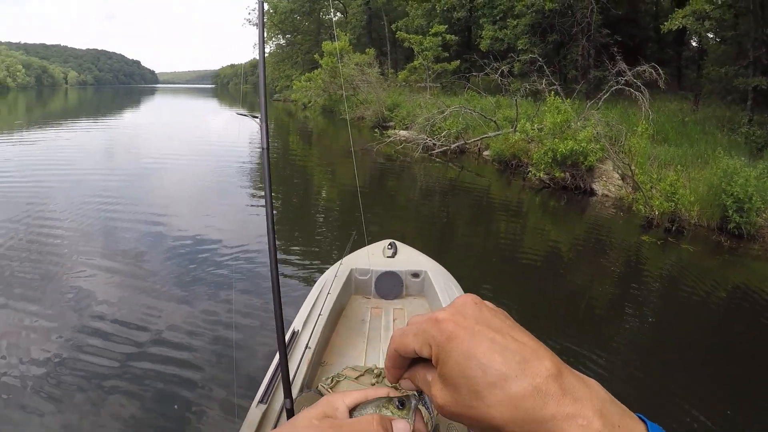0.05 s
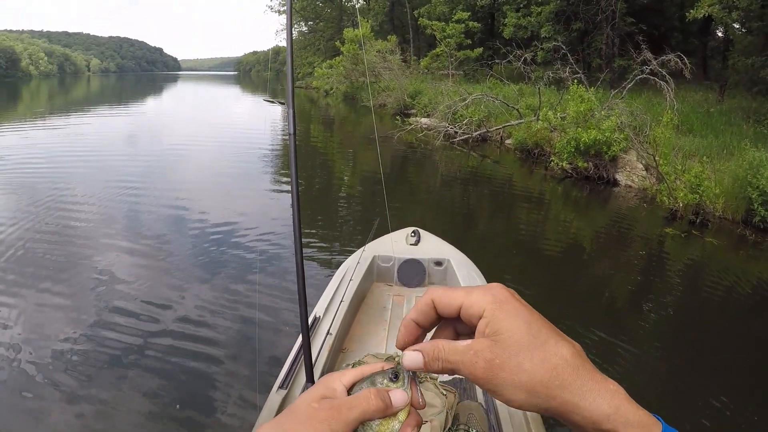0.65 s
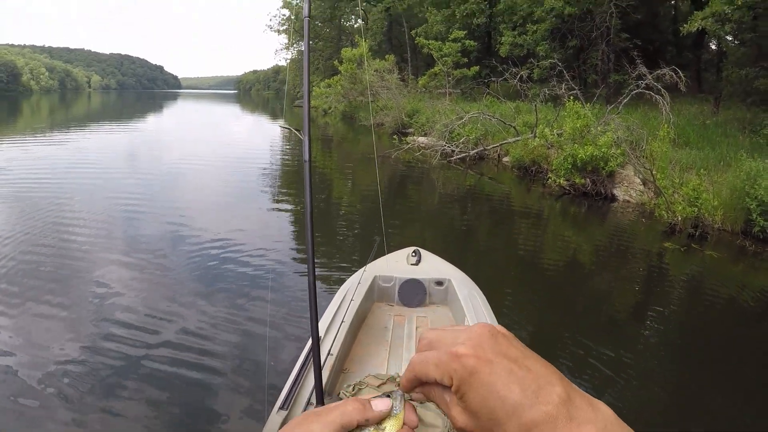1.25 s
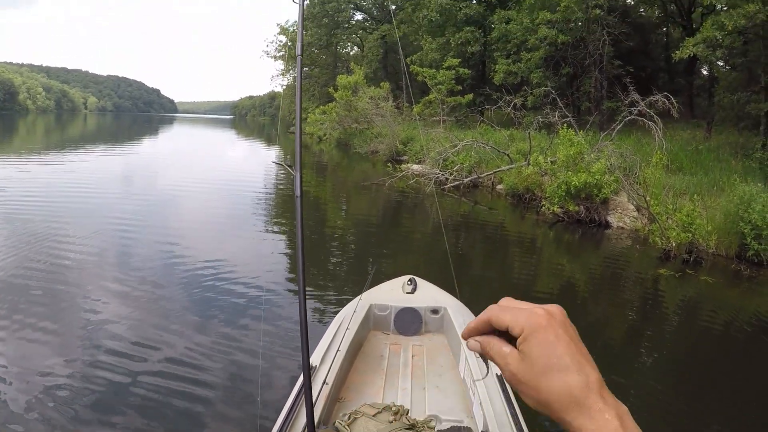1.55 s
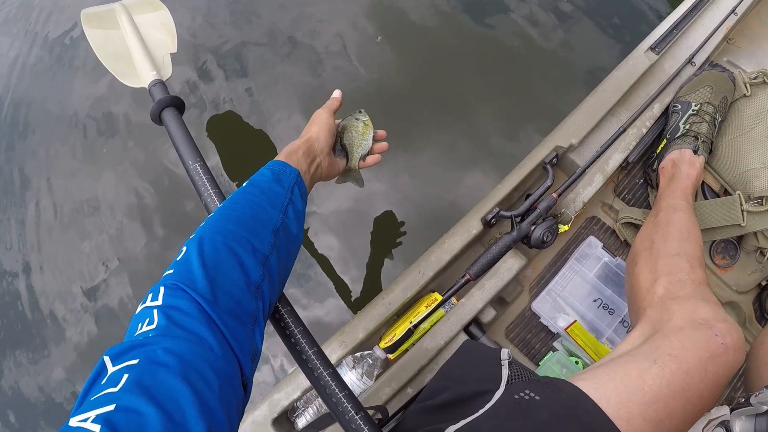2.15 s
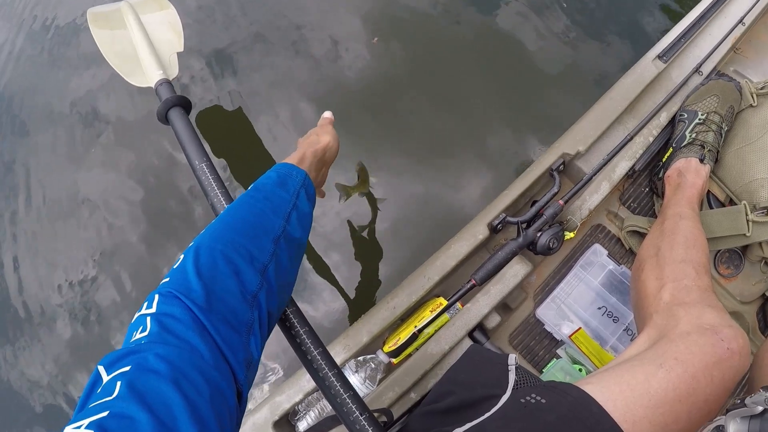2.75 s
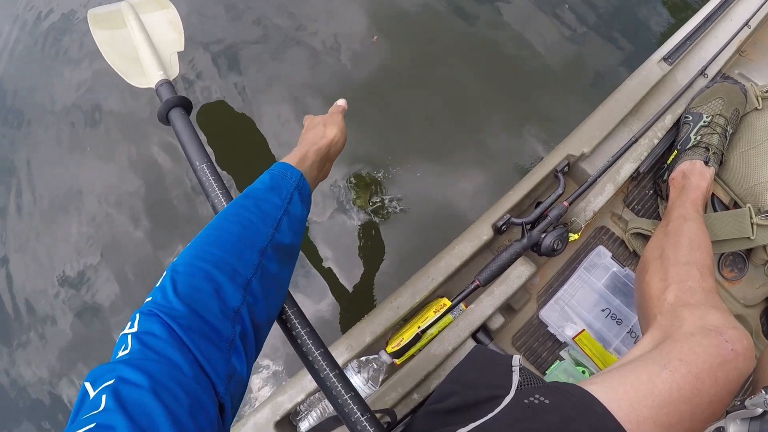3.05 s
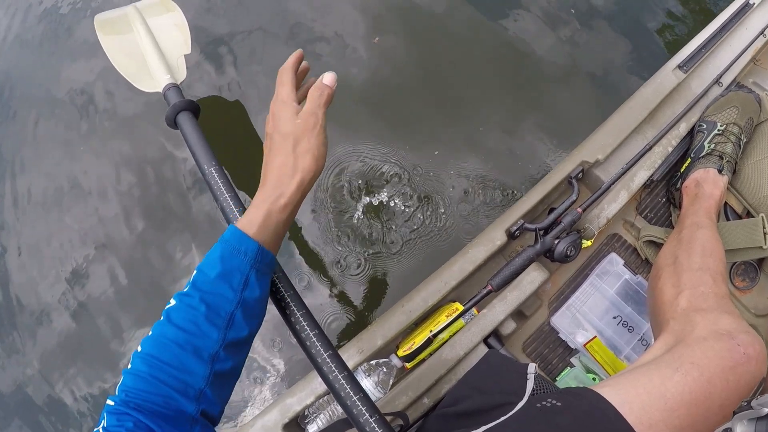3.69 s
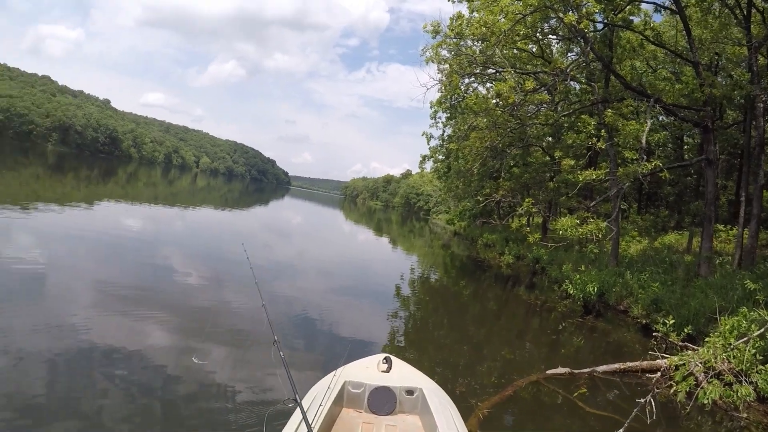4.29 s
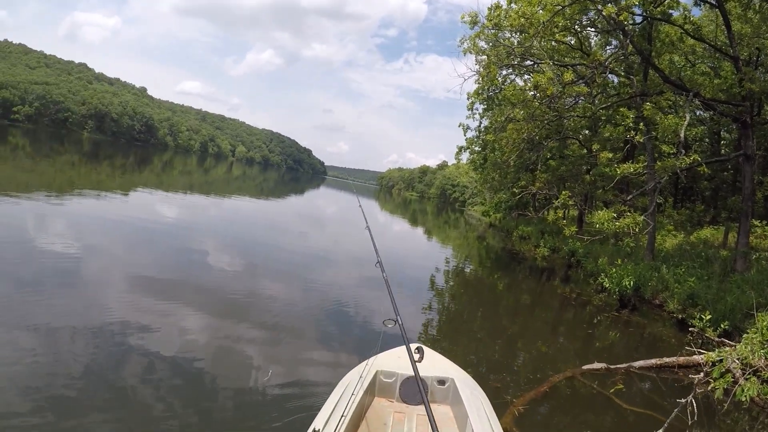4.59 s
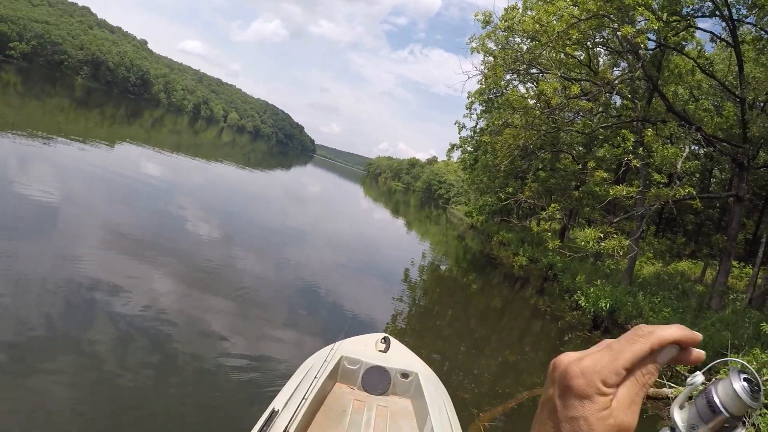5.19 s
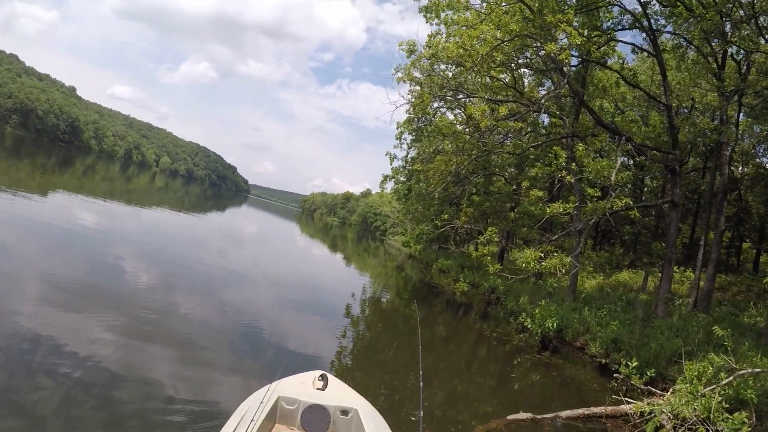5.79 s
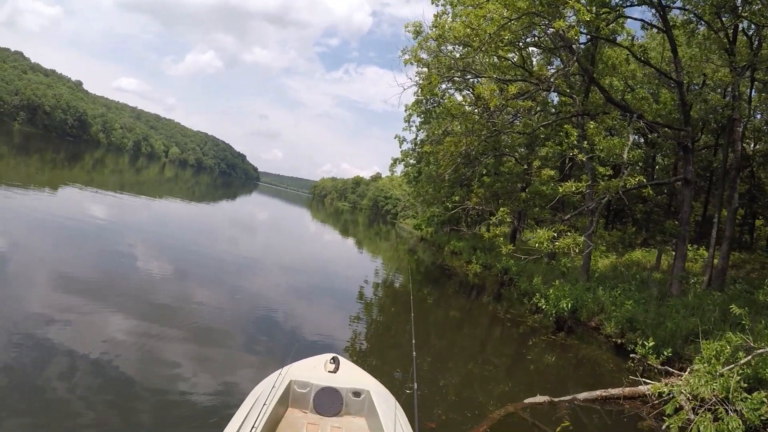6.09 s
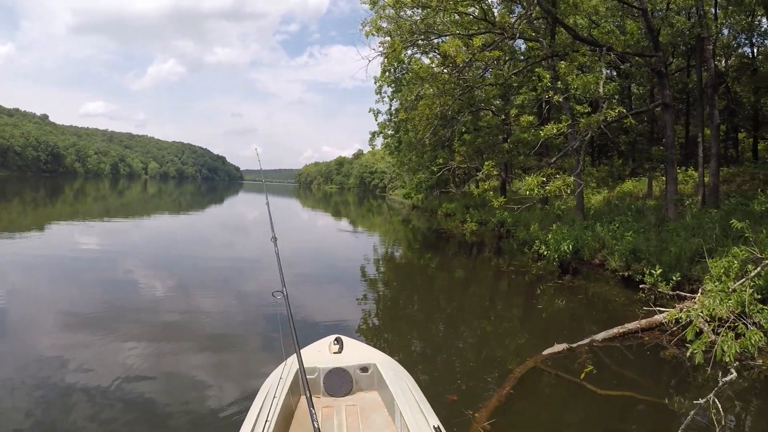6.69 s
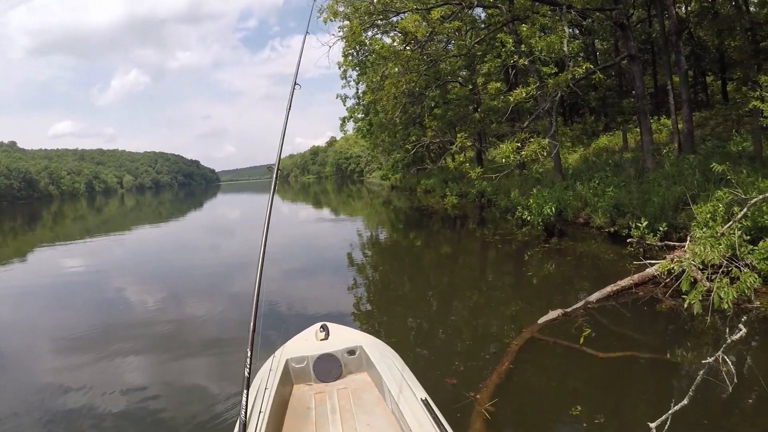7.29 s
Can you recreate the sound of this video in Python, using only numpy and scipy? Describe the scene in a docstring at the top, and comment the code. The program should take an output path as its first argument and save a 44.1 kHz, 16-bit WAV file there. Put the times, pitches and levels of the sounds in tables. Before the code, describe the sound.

A quiet, wide hush lies over a lake. For the first 1.5 seconds a breeze buffets the microphone and cloth rubs on it with a low rumble, while songbirds chirp and whistle from the right, echoing in trees. From about 2 to 3.8 seconds the sound is slowed and muffled: dull drips and ringing bubbles build to one loud plop of a small fish at 3 seconds. A sharp, close tackle click at 3.9 seconds brings back normal sound, with more chirps and faint far insects. Around 5.2 seconds a rod swishes, line zips briefly over its guides, a sleeve rustles and the hollow kayak hull bumps. Birds keep calling. More sharp clicks come at about 6.6 seconds, then a soft bump, and from 7 seconds the reel knocks faintly and faster as it is wound.

```python
"""A breeze buffets the microphone and cloth rubs its mount, in a kayak lying still by a wooded lake shore.
Songbirds whistle from the right bank and the trees echo them, over far insects and a wide hush.
From about 2 to 3.8 s a small fish is let go in slow motion: dull drips, ringing bubbles and one plop.
Back at normal speed, tackle clicks close by, the hollow hull bumps, the rod casts with a zip of line
over its guides, and the reel knocks softly as it is wound."""
import sys
import numpy as np
from scipy import signal
from scipy.fft import rfft, irfft, next_fast_len
from scipy.io import wavfile

SR = 44100
rng = np.random.default_rng(int(sys.argv[2]) if len(sys.argv) > 2 else 0)


def store_pcm(level_fs):
    """Save levels as 16-bit WAV."""
    pcm = np.round(np.clip(level_fs, -1, 1) * 32767).astype(np.int16)
    wavfile.write(sys.argv[1], SR, np.atleast_2d(pcm).T)


N = 328104
PADDED = next_fast_len(N, real=True)
TIME, FREQS = np.arange(N) / SR, np.fft.rfftfreq(PADDED, 1 / SR)


# the fish slaps the surface beside the kayak: (time [s], peak [dB], pitch [Hz])
FISH_SLAPS = [(3.005, -16.5, 1820), (3.019, -14, 830), (3.0277, -14.5, 1120)]
# larger bubbles: (time [s], peak [dB], pitch [Hz], ring [cycles], pan [dB]); pan is left minus right
TRAPPED_BUBBLES = [(2.067, -40, 1330, 12, 0), (2.498, -42.5, 1420, 13, -1.5), (2.701, -39.5, 680, 14, 2),
                   (2.795, -32.5, 121, 9.3, -6.5), (2.821, -39, 940, 14, -2), (2.8415, -33, 1484, 75, 0),
                   (2.86, -37, 1650, 33, 4), (2.927, -40, 1910, 44, 4), (2.941, -32.5, 319, 42, 5.5),
                   (2.963, -28, 338.3, 37, 9), (3.003, -19, 489, 14.4, 8), (3.0235, -23.5, 614, 31, 0),
                   (3.029, -16.5, 1100, 33, -1), (3.079, -41, 215, 34, 0.5), (3.0885, -34, 1420, 50, -1),
                   (3.142, -38.5, 698, 89, -3.5), (3.231, -35.5, 416, 24, 7)]
# water stirred up and falling back: (time [s], length [s], level [dB], pan [dB])
SPLASHES = [(2.055, .015, -59, 0), (2.695, 0.044, -49.5, -0.5), (2.75, .06, -50.5, 0),
            (2.818, 0.045, -45.5, 2), (2.87, 0.15, -55, -2), (2.998, 0.011, -30.5, -4.5),
            (3.017, 0.014, -31.5, 3), (3.06, .065, -46.5, 1), (3.13, 0.035, -52, -2), (3.2, 0.61, -65, 2.5)]
# tone of the falling drops: (frequency [Hz], gain [dB])
DROP_COLOUR = [(100, 1.5), (300, -2), (700, -4), (1400, 1.5), (2200, -4), (3200, -14), (4000, -19)]

def fish_release(drops_per_s=1800, drop_pitches=30, drop_cycles=9, bubble_rise_per_s=8.5):
    """A fish slaps the water; trapped bubbles ring, rising in pitch as they surface, amid tiny drops."""
    out, patter = np.zeros((2, 2, N))
    slaps = [(s, db, hz, 0.0068, 0.12, 0.23, 1) for s, db, hz in FISH_SLAPS]
    bubbles = [(s, db, hz, cycles / hz, bubble_rise_per_s * cycles / hz, 0.51, pan_db)
               for s, db, hz, cycles, pan_db in TRAPPED_BUBBLES]
    for s, db, hz, t60, rise, swell_cycles, pan_db in slaps + bubbles:
        lead_rad = 0.7 + 0.11 * pan_db  # water farther left reaches the left port earlier
        add(out, s, amp(db) * ping(hz, t60, rise, lead_rad, swell_cycles) * pan(pan_db))
    for hz in np.geomspace(280, 3700, drop_pitches):
        lands = rng.random(N) < drops_per_s / drop_pitches / SR
        sizes = amp(0.5 * np.minimum(rng.exponential(1, N), 3))
        drop = ping(hz, drop_cycles / hz, rise=0.2, lead_rad=rng.normal(0.36, 1.0), swell_cycles=0.2)
        patter += signal.oaconvolve((lands * sizes)[None], drop[:, :SR // 20] * hz, axes=1)[:, :N]
    out += unit(colour(patter, DROP_COLOUR)) * swells(SPLASHES, attack_s=0.0035, release_s=0.011)
    return out + amp(-18) * echoes(out, t60=0.17, gap_s=0.0052, build_s=0.0041)


def slow_motion_tone(x, edge_hz=3900, rate_hz=12000):
    """Sparse samples joined by straight lines: a dull sound under a faint, glassy mirror image."""
    mirrored = low_pass(x, edge_hz) * (1 + 2 * amp(1.5) * np.cos(2 * np.pi * rate_hz * TIME))
    return irfft(rfft(mirrored, PADDED) * np.sinc(FREQS / rate_hz) ** 2, PADDED)[:, :N]


# hard tackle clicking close by: (time [s], level [dB], pitch [Hz], mode spread [octaves], pan [dB])
TACKLE_CLICKS = [(.0812, -40, 6900, 0.28, -9), (0.148, -28, 3750, 0.44, -3),
                 (3.9309, -15, 6330, .14, -10.5), (3.932, -39, 11500, .24, 2), (3.934, -23, 6300, 0.29, -7),
                 (3.9428, -25, 1750, 0.26, -4), (3.9422, -27.5, 5250, .55, 6), (4.808, -39, 3300, .35, -10),
                 (4.991, -39, 6930, 0.18, -17), (5.3325, -38, 5030, 0.4, -4), (5.345, -31, 3320, 0.18, -1),
                 (6.631, -18, 4700, 0.37, -2), (6.6395, -32, 5000, 0.77, -2), (6.6525, -35, 6600, 0.33, 3),
                 (6.665, -30.5, 1800, 0.13, -2), (6.6662, -30.5, 5500, 0.54, -1),
                 (7.2995, -37.5, 1460, 0.072, -10), (7.354, -37, 9100, 0.65, -6)]
# dull knocks of rod and reel: (time [s], level [dB], pan [dB])
ROD_KNOCKS = [(3.944, -42, -4), (4.9905, -38.5, -5), (5.405, -42.5, 8), (6.7125, -41.5, -7),
              (6.775, -43, -3)]

def tackle(modes=24, knock_hz=819, reel_from_s=6.975):
    """Each contact rings a cluster of short plastic modes; the open hull throws a little back."""
    gaps_s = np.maximum(0.105 * 0.79 ** np.arange(8), 0.04)  # the reel handle gathers speed
    reel = [(reel_from_s + s, -46.5 - 3 * s, -11.5) for s in np.cumsum(gaps_s) - gaps_s]
    clicks = [(s, db, hz, 0.0082 * 5070 / hz, octaves, pan_db)  # higher clicks die sooner
              for s, db, hz, octaves, pan_db in TACKLE_CLICKS]
    knocks = [(s, db, knock_hz, 0.12, 0.224, pan_db) for s, db, pan_db in ROD_KNOCKS + reel]
    out, t = np.zeros((2, N)), np.arange(SR // 8) / SR
    for s, db, hz, t60, octaves, pan_db in clicks + knocks:
        scatter, port_offset, start_phase = rng.standard_normal((3, modes, 1))
        spread = np.sqrt(3) * np.linspace(-1, 1, modes)[:, None] + 0.36 * scatter
        mode_hz = np.minimum(hz * 2 ** (octaves * spread), SR / 3)
        phase = 2 * np.pi * (mode_hz * t + start_phase)
        ring = np.array([np.sin(phase + 0.65 * port_offset).sum(0), np.sin(phase).sum(0)])
        ring *= amp(-60 * t / t60) * (1 - np.exp(-t / 0.0001))
        add(out, s, amp(db) * ring / (1.35 * np.sqrt(modes)) * pan(pan_db))
    return out + amp(-11) * echoes(out, t60=0.12, gap_s=0.0066, build_s=0.0011)


# line running over the guides: (time [s], buzz rate [Hz])
LINE_RATE = [(5.2, 927), (5.275, 1153), (5.335, 1270), (5.46, 1136)]
# spurts off the spool; the rod's back and forward swings: (time [s], length [s], level [dB], pan [dB])
LINE_SPURTS = [(5.225, 0.042, -47.5, 1), (5.258, 0.028, -42, -1), (5.316, 0.01, -45.5, -10)]
ROD_SWINGS = [(5.09, .14, -51, -2), (5.26, 0.16, -46, -3.5)]
# tone of line and rod: (frequency [Hz], gain [dB])
LINE_COLOUR = [(2500, -28), (3600, -1.5), (4600, -1), (6000, 1), (7400, 4.5), (9000, -8), (11500, -15),
               (14500, -16)]
ROD_COLOUR = [(150, -15), (330, 10), (480, 5), (700, -6.5), (1000, -2.5), (1400, -14), (2500, -12),
              (6000, -52)]

def cast(roughness=0.81, jitter=0.01234):
    """The rod sweeps the air near the microphone while the line zips out, buzzing over the guides."""
    turns = np.cumsum(curve(LINE_RATE) * (1 + jitter * drift(215))) / SR
    buzz = unit(sum(np.cos(2 * np.pi * k * turns + k * k) for k in range(3, 13)))
    line = unit(colour(buzz, LINE_COLOUR)) + roughness * noise(LINE_COLOUR)
    whoosh = noise(ROD_COLOUR) * swells(ROD_SWINGS, attack_s=0.014, release_s=0.018)
    return unit(line) * swells(LINE_SPURTS, attack_s=0.0072, release_s=0.009) + whoosh


# soft blows on the kayak: (time [s], peak [dB], pitch [Hz], t60 [s], pan [dB])
HULL_BUMPS = [(1.696, -32.5, 262, 0.058, 2), (3.941, -40, 410, 0.024, -4), (5.234, -33.5, 260, 0.027, -16),
              (5.283, -21, 219, 0.018, -14.5), (6.774, -31.5, 278, 0.027, -5)]

def hull():
    """The hollow hull answers a soft blow with a few low cycles."""
    out = np.zeros((2, N))
    for s, db, hz, t60, pan_db in HULL_BUMPS:
        add(out, s, amp(db) * ping(hz, t60, rise=0, lead_rad=2.5, swell_cycles=2.3) * pan(pan_db))
    return out


# arched syllables: (time [s], length [s], first [Hz], middle [Hz], last [Hz], source level [dB])
BANK_CHIRPS = [(0.108, 0.034, 3310, 3000, 2900, -62), (0.274, 0.024, 2400, 2360, 2270, -61),
               (0.504, 0.029, 6570, 6040, 4530, -49.5), (0.525, 0.031, 4330, 5050, 5800, -52),
               (.555, 0.049, 5650, 5780, 5700, -56), (0.707, 0.03, 2960, 3200, 3300, -56),
               (0.73, 0.056, 2776, 3567, 2640, -48), (0.775, 0.058, 2850, 2523, 2900, -50.5),
               (0.845, 0.036, 2680, 3410, 3900, -51), (1.002, 0.046, 2810, 3430, 4280, -58),
               (1.455, 0.052, 2427, 2620, 3100, -64), (1.528, 0.052, 3140, 2890, 2450, -63),
               (4.159, 0.035, 3470, 3700, 3050, -57), (4.184, 0.039, 2960, 3710, 4520, -50),
               (4.21, 0.079, 3405, 3350, 2570, -51.5), (4.288, .03, 2880, 3000, 2450, -57),
               (4.405, 0.054, 2570, 2840, 3200, -57), (4.453, 0.033, 3020, 3800, 3240, -47),
               (4.482, 0.019, 2850, 2625, 2510, -51), (4.506, 0.051, 2570, 3210, 3400, -52),
               (5.06, .05, 4700, 4500, 4400, -61), (5.158, 0.032, 3600, 3350, 3100, -56),
               (5.5, 0.021, 6200, 5900, 5670, -47.5), (5.531, 0.033, 4640, 5170, 5200, -51),
               (5.695, .066, 2770, 3560, 2500, -46.5), (5.789, .05, 2645, 2740, 3670, -53),
               (6.79, 0.054, 3230, 4080, 5270, -50.5), (6.862, 0.076, 3130, 4140, 4750, -49)]
# thin slides that level off: (time [s], length [s], first [Hz], last [Hz], source level [dB])
BANK_WHISTLES = [(0.373, 0.28, 7980, 7240, -57.5), (1.713, 0.21, 7680, 7280, -57.5),
                 (1.722, .22, 7120, 6380, -58), (6.556, .6, 6020, 7000, -62)]
# a far bird's figure, a falling slur and then a rising sweep: (time [s], base level [dB])
FAR_FIGURES = [(5.419, -55.5), (5.652, -54.5), (5.88, -56), (6.104, -54.5)]

def birds():
    """Songs from the right bank scatter off leaves, trunks and deep wood; the far bird is only echo."""
    chirps = [(s, arch(length, *hz), db) for s, length, *hz, db in BANK_CHIRPS]
    slides = [(s, last + (first - last) * np.linspace(1, 0, round(length * SR)) ** 1.3, db)
              for s, length, first, last, db in BANK_WHISTLES]
    slurs = [(s, arch(0.097, 5100, 4490, 3640), db - 3.5) for s, db in FAR_FIGURES]
    sweeps = [(s + 0.13, arch(0.058, 5100, 7030, 7660), db + 2.5) for s, db in FAR_FIGURES]
    warble = sing(chirps, waver=0.016, flutter_db=2.5)
    whistle = sing(slides, waver=0.011, flutter_db=1.5)
    everyone = warble + whistle + sing(slurs + sweeps, waver=0.0265, flutter_db=4.5)
    direct = amp(-5.5) * warble + amp(-3) * whistle
    leaves = amp(-10.5) * echoes(warble + whistle, t60=0.063, gap_s=0, build_s=0.00021)
    trunks = amp(-4) * echoes(everyone, t60=0.2, gap_s=0.0023, build_s=0.012)
    wood = amp(-6.5) * echoes(everyone, t60=0.85, gap_s=0.022, build_s=0.018)
    return direct * pan(-6) + (leaves + trunks + wood) * pan(-5.5)


def sing(notes, waver, flutter_db, attack_s=0.0044, release_s=0.0054, left_lead_s=0.00005):
    """Each bird note is a pure, slightly unsteady tone with quick edges."""
    song, wander, flutter = np.zeros((2, N)), drift(198), drift(150)
    for s, glide, db in notes:
        t = np.arange(len(glide)) / SR
        hz = glide * (1 + waver * np.interp(s + t, TIME, wander))
        phase = 2 * np.pi * (np.cumsum(hz) / SR + np.array([[left_lead_s], [0]]) * hz)
        edges = np.minimum(np.minimum(t / attack_s, (t[-1] - t) / release_s), 1)
        gain = np.sqrt(2) * amp(db + flutter_db * np.interp(s + t, TIME, flutter))
        add(song, s, gain * edges * np.sin(phase))
    return song


# gusts right on the microphone: (time [s], length [s], level [dB], pan [dB])
MIC_GUSTS = [(-.3, 0.83, -36, 6.5), (.55, 0.65, -42.5, 6.5), (5.29, 0.37, -47, -0.5), (6.0, 1.2, -63, -6)]
# tone of the buffeting: (frequency [Hz], gain [dB])
GUST_COLOUR = [(15, 5.5), (30, -5), (52, 5.5), (100, -4), (170, -17), (300, -42), (700, -67), (2000, -116)]

def breeze(lumps_db=2):
    """Eddies buffet each microphone port separately."""
    eddies = noise(GUST_COLOUR) * amp(lumps_db * drift(20))
    return eddies * swells(MIC_GUSTS, attack_s=0.071, release_s=0.41)


# drags on the microphone's mount; a sleeve close by: (time [s], length [s], level [dB], pan [dB])
MOUNT_RUBS = [(-.1, 1.75, -55, 8.5), (.275, .055, -41, 12), (.59, 0.5, -42.5, 10), (.82, 0.3, -41, 6),
              (1.15, 0.21, -46, 5.5), (5.05, 0.059, -54.5, -13), (5.16, 0.13, -45.5, -2),
              (5.31, 0.13, -42, 4.5), (5.49, 0.029, -44, 0), (5.6, 1.7, -76, -11)]
SLEEVE_SWISHES = [(-.1, 0.22, -65.5, 4), (.5, 0.18, -72, 8), (5.05, 0.58, -58.5, -2), (5.22, 0.084, -46, 0),
                  (5.6, 1.5, -69.5, 15)]
# tone of the mount's rumble before its pitch shift, and of the sleeve: (frequency [Hz], gain [dB])
MOUNT_COLOUR = [(40, -62), (75, -20), (110, 3), (150, 1), (210, -2), (290, -14.5), (380, -29), (600, -36),
                (1500, -62), (4000, -61)]
SWISH_COLOUR = [(200, -45), (600, -4.5), (1200, -11), (2200, -15), (4000, -13.5), (6300, -12.5),
                (8500, -17.5), (11000, -24), (15000, -44)]
# pitch shift of the rumble: (time [s], frequency factor [ratio])
MOUNT_PITCH = [(0, 0.78), (1.0, 0.9), (1.5, 1.3), (5.0, 1.5), (7.44, 1.43)]

def rubbing(grain_db=3, lumps_db=2):
    """Hands and cloth drag over the mount: a rumble that rises in pitch, and a grainy hiss."""
    position = np.cumsum(curve(MOUNT_PITCH)) % (N - 1)
    rumble = np.array([np.interp(position, np.arange(N), port) for port in noise(MOUNT_COLOUR)])
    hiss = noise(SWISH_COLOUR) * amp(grain_db * drift(261.3))
    hiss *= swells(SLEEVE_SWISHES, attack_s=0.025, release_s=0.1)
    rumble *= amp(lumps_db * drift(30)) * swells(MOUNT_RUBS, attack_s=0.0083, release_s=0.046)
    return rumble + hiss


# tone of the far insects: (frequency [Hz], gain [dB])
INSECT_COLOUR = [(4500, -30), (5700, -7), (6150, -5.5), (6700, -10.5), (7600, -8.5), (9000, -41)]
# their rise and fall: (time [s], level [dB])
INSECT_LEVEL = [(0, -70), (1.9, -71), (3.9, -62.5), (4.6, -64.5), (5.2, -59), (6.5, -62), (7.4, -63)]

def insects(flicker_db=0.9):
    """A thin, far chorus, a little to the right."""
    return noise(INSECT_COLOUR) * amp(curve(INSECT_LEVEL) + flicker_db * drift(25)) * pan(-2.9)


# still air over the lake, at normal speed and slowed: (frequency [Hz], gain [dB])
LAKE_COLOUR = [(30, -12), (90, -29), (120, -13), (150, 5.5), (300, -0.5), (500, -7), (1000, -11),
               (2000, -16), (3500, -18), (5000, -23), (6200, -21.5), (7700, -22), (9000, -21),
               (12000, -28.5), (15000, -39.5)]
SLOWED_COLOUR = [(15, -23), (30, -4), (60, -3.5), (110, -15), (210, -20), (470, -25.5), (700, -26.5),
                 (1000, -30), (1300, -32.5), (1560, -24.5), (1900, -31), (2600, -34), (3200, -41.5),
                 (3900, -48.5)]
# its stereo width: (frequency [Hz], side minus mid [dB])
LAKE_WIDTH = [(100, 1.5), (200, 1), (380, 4.5), (700, 10), (1290, 8), (2380, 1.5), (4400, -4.5),
              (8120, 0.5)]
SLOWED_WIDTH = [(60, 3), (110, -1.5), (200, 11), (380, 8), (700, -1.5), (1290, 1.5), (4000, 0)]
# its balance at the microphone: (frequency [Hz], pan [dB])
LAKE_BALANCE = [(100, 0), (1290, -0.5), (2380, 1), (4400, -1.5), (8120, -3), (15000, 0.5)]
SLOWED_BALANCE = [(60, -3), (700, 1), (1400, -5.5), (4000, -0.5)]
# its loudness at normal speed: (time [s], level [dB])
LAKE_LEVEL = [(0, -52.5), (5.7, -52), (7.4, -51)]

def air(spectrum, width, balance, flicker_db=0.36):
    """A wide, even hush over open water."""
    mid = unit(colour(rng.standard_normal(N), spectrum))
    side = colour(unit(colour(rng.standard_normal(N), spectrum)), width)
    ports = irfft(rfft([mid + side, mid - side], PADDED) * pan(per_bin(balance)), PADDED)[:, :N]
    return ports * amp(flicker_db * drift(34))


def ping(hz, t60, rise, lead_rad, swell_cycles):
    """A damped tone that swells over some cycles; its pitch climbs by the share `rise` over t60."""
    t = np.arange(SR // 5) / SR
    turns = hz * np.cumsum(1 + rise * np.minimum(t / t60, 1)) / SR
    shape = amp(-60 * t / t60) * (1 - np.exp(-(turns / swell_cycles) ** 2))
    return shape / shape.max() * np.sin(2 * np.pi * turns + np.array([[.5], [-.5]]) * lead_rad)


def arch(length_s, first, middle, last):
    """A glide that bends smoothly through three pitches."""
    u = np.linspace(0, 1, round(length_s * SR))
    return first + (last - first) * u + (middle - (first + last) / 2) * (1 - (2 * u - 1) ** 2)


def swells(rows, attack_s, release_s):
    """Left and right gains of sounds that rise, hold for their length and die away."""
    power = np.zeros((2, N))
    for s, length, db, pan_db in rows:
        t = np.maximum(TIME - s, 0)
        shape = (1 - np.exp(-(t / attack_s) ** 2)) * np.exp(-np.maximum(t - length, 0) / release_s)
        power += (amp(db) * shape * pan(pan_db)) ** 2
    return np.sqrt(power)


def echoes(x, t60, gap_s, build_s):
    """Scattered reflections that build up after a gap and die away."""
    t = np.arange(SR) / SR
    taps = rng.standard_normal((2, SR)) * (rng.random((2, SR)) < 1 / 20)
    tail = taps * (1 - np.exp(-np.maximum(t - gap_s, 0) / build_s)) * amp(-60 * t / t60)
    return signal.oaconvolve(x, tail / np.linalg.norm(tail, axis=1, keepdims=True), axes=1)[:, :N]


def noise(points):
    """Coloured noise, unrelated in the two channels."""
    return unit(colour(rng.standard_normal((2, N)), points))


def drift(rate_hz):
    """Smooth random wander of rms 1."""
    spectrum = rfft(rng.standard_normal(PADDED)) * np.exp(-(FREQS / rate_hz) ** 2)
    return unit(irfft(spectrum, PADDED)[:N])


def colour(x, points):
    """Filters by a (frequency [Hz], gain [dB]) table."""
    return irfft(rfft(x, PADDED) * amp(per_bin(points)), PADDED)[..., :N]


def low_pass(x, hz):
    """Steep band limit."""
    taps = signal.firwin(401, hz, window=("kaiser", 8), fs=SR)
    return signal.oaconvolve(x, taps[None], "same", axes=1)


def per_bin(points):
    """A spectrum table joined up on a log-frequency axis."""
    hz, value = np.transpose(points)
    return np.interp(np.log(FREQS + 1), np.log(hz + 1), value)


def curve(rows):
    """A time table joined by straight lines."""
    return np.interp(TIME, *np.transpose(rows))


def add(mix, s, sound):
    """Mixes a stereo sound in at time s."""
    part = mix[:, max(round(s * SR), 0):][:, :sound.shape[1]]
    part += sound[:, :part.shape[1]]


def pan(db):
    """Stereo gains for a left-minus-right level."""
    return amp(np.array([[.5], [-.5]]) * db)


def amp(db):
    """Decibels to gain."""
    return 10 ** (np.asarray(db) / 20)


def unit(x):
    """Scales to rms 1."""
    return x / np.sqrt(np.mean(x ** 2) + 1e-20)


def scene(slow_from_s=1.968, slow_to_s=3.832, fade_s=0.034):
    """The lake heard from the kayak, giving way in the middle to the slowed release of the fish."""
    hush = air(LAKE_COLOUR, LAKE_WIDTH, LAKE_BALANCE) * amp(curve(LAKE_LEVEL))
    lake = hush + insects() + birds() + breeze() + rubbing() + cast() + tackle() + hull()
    slowed_hush = air(SLOWED_COLOUR, SLOWED_WIDTH, SLOWED_BALANCE) * amp(-50)
    slowed = slow_motion_tone(slowed_hush + fish_release())
    inside = np.minimum(TIME - slow_from_s, slow_to_s - TIME) / fade_s  # positive in slow motion
    return lake * np.clip(-inside, 0, 1) ** 2 + slowed * np.clip(inside, 0, 1) ** 2


def record(dry):
    """The camera's band limit."""
    return low_pass(dry, hz=15600)


dry = scene()
out = record(dry)
store_pcm(out)
```